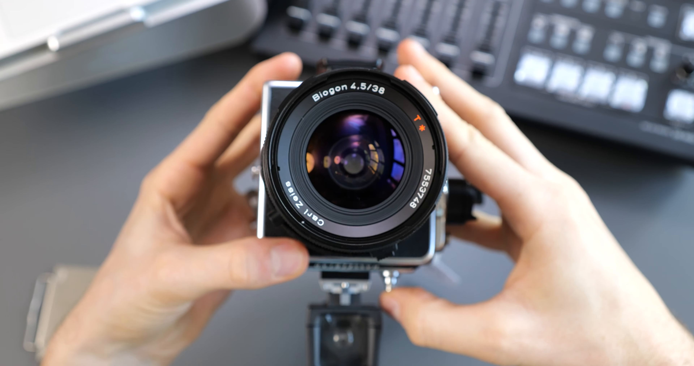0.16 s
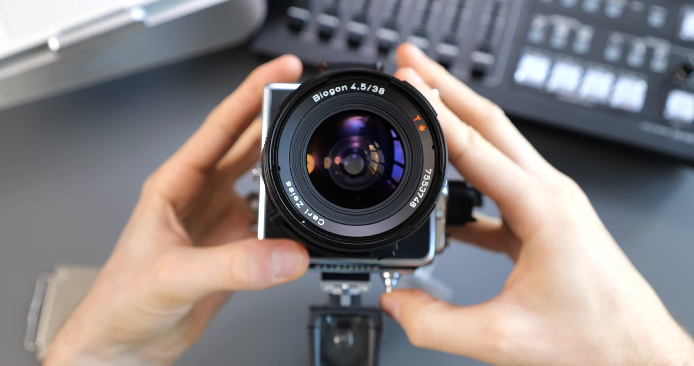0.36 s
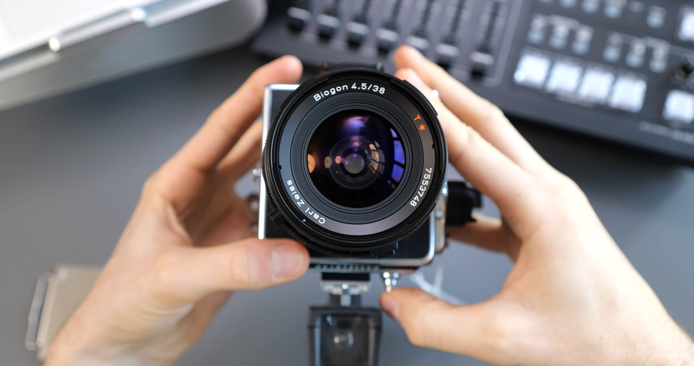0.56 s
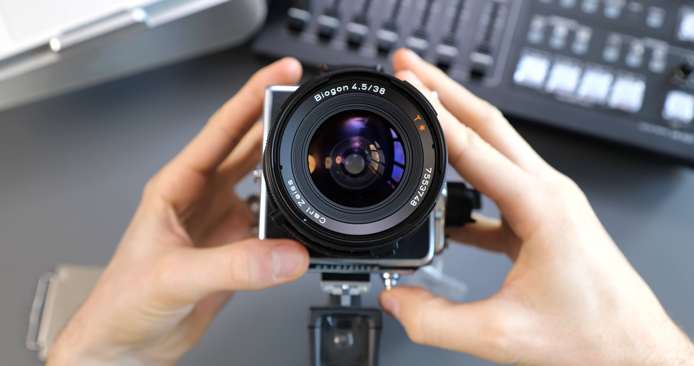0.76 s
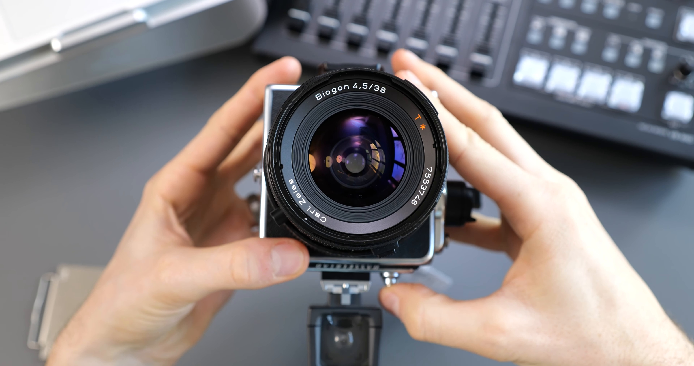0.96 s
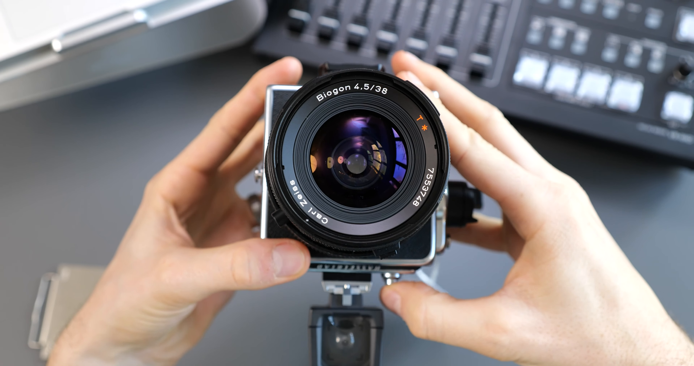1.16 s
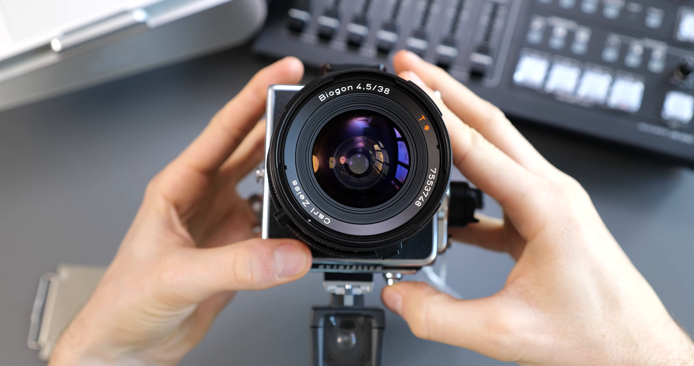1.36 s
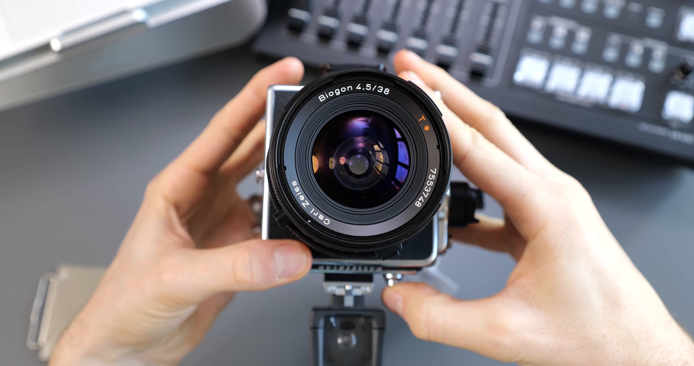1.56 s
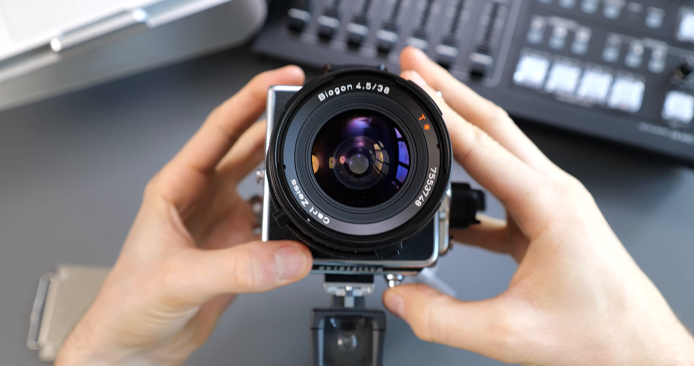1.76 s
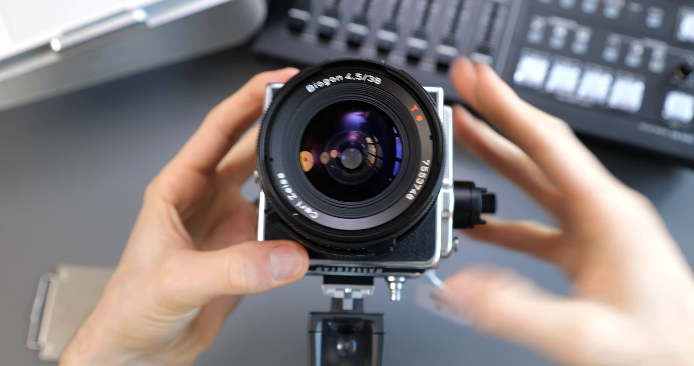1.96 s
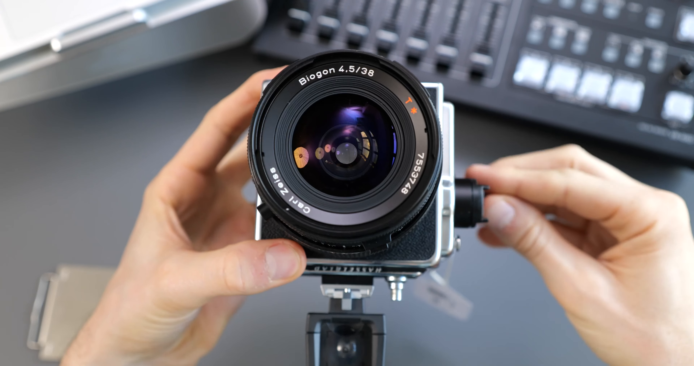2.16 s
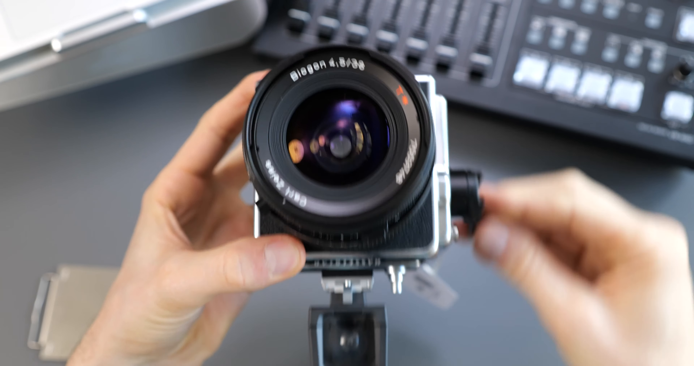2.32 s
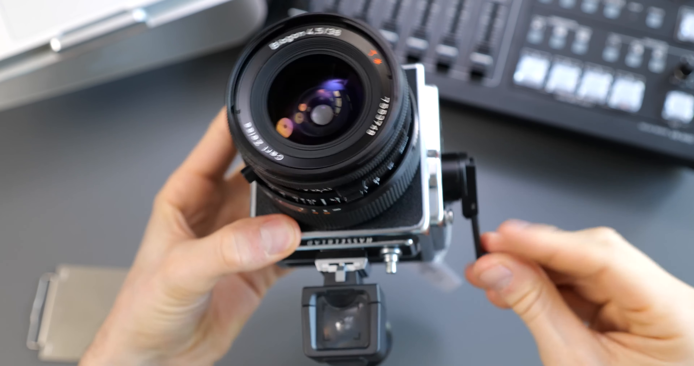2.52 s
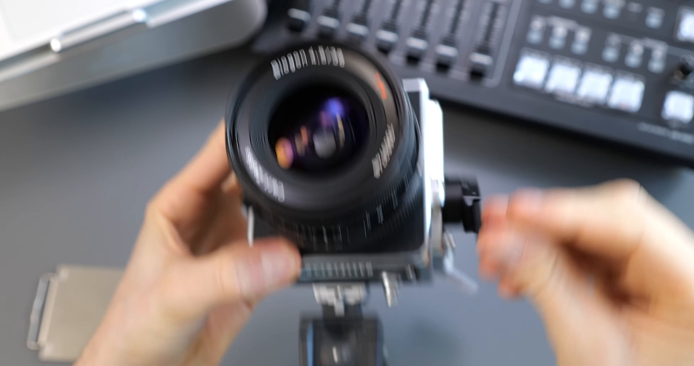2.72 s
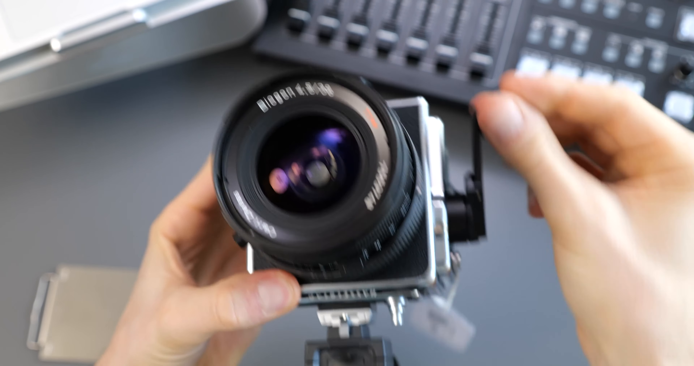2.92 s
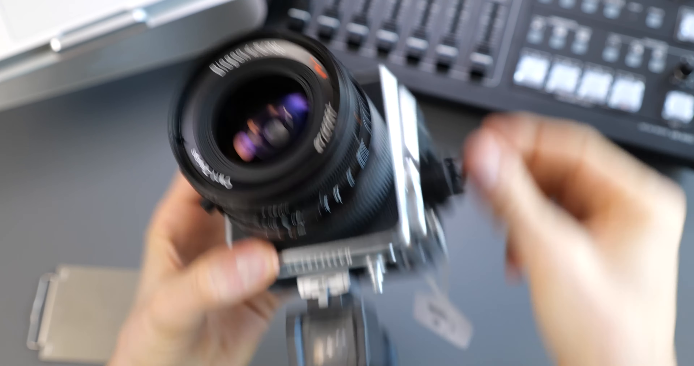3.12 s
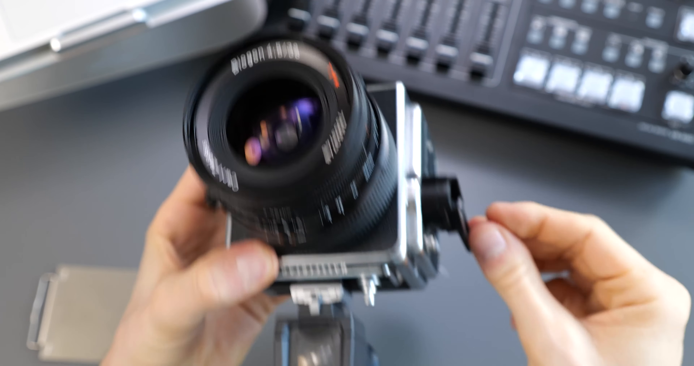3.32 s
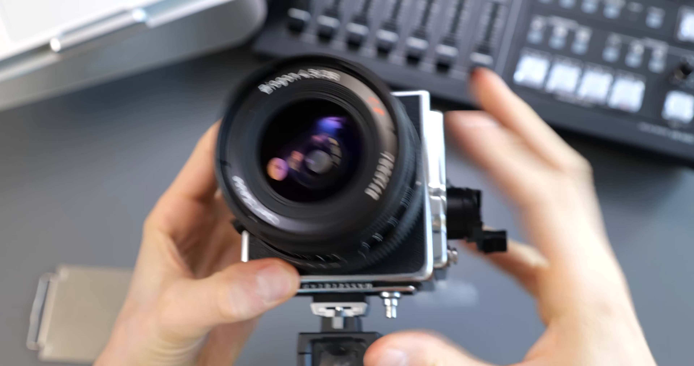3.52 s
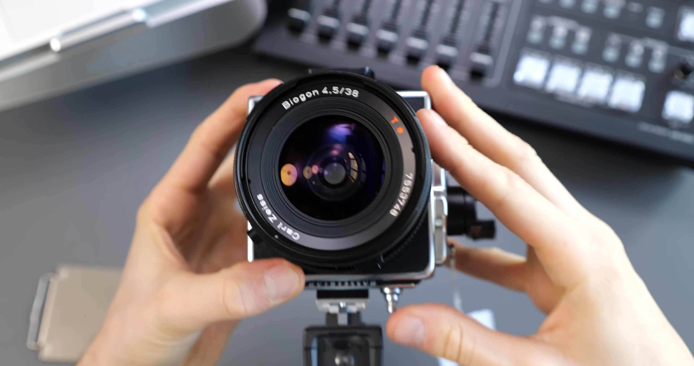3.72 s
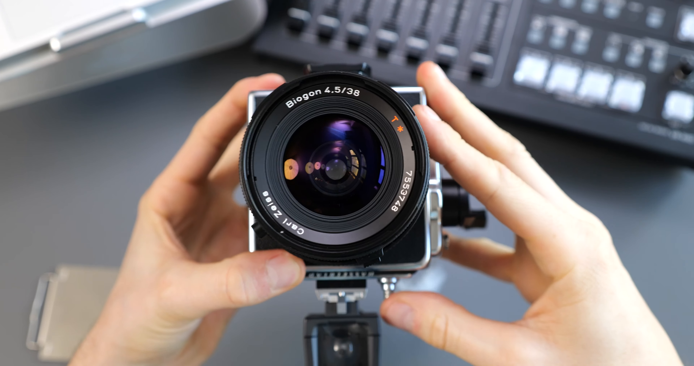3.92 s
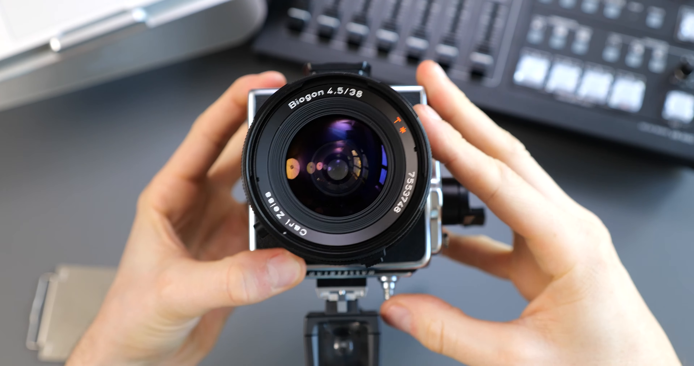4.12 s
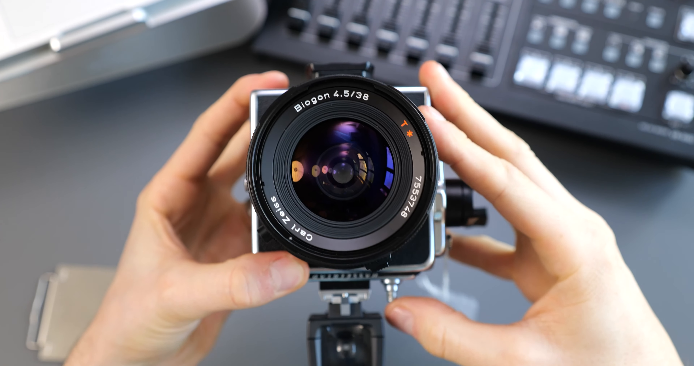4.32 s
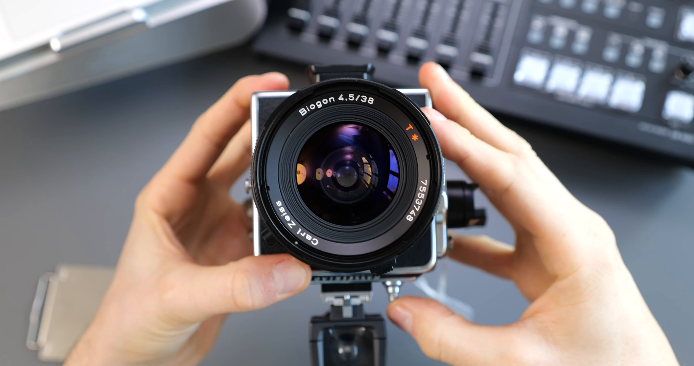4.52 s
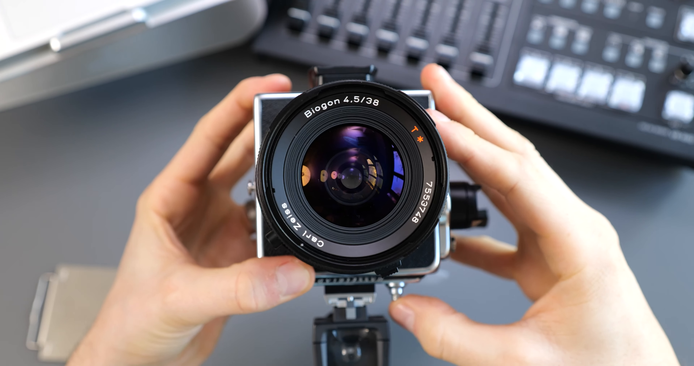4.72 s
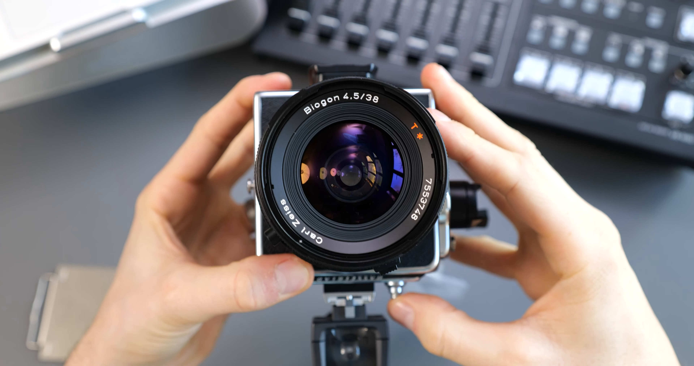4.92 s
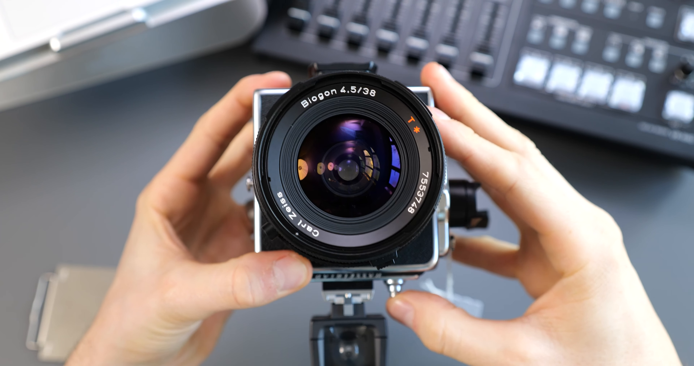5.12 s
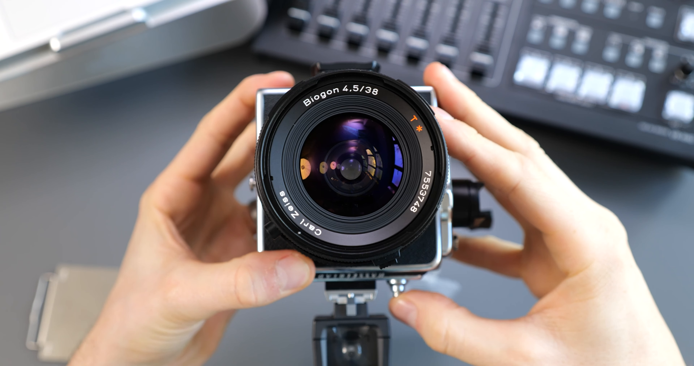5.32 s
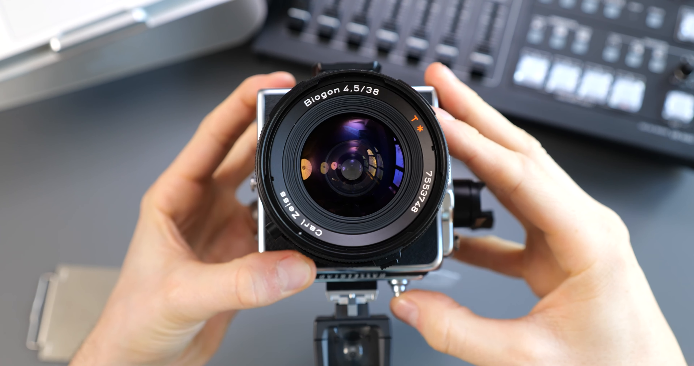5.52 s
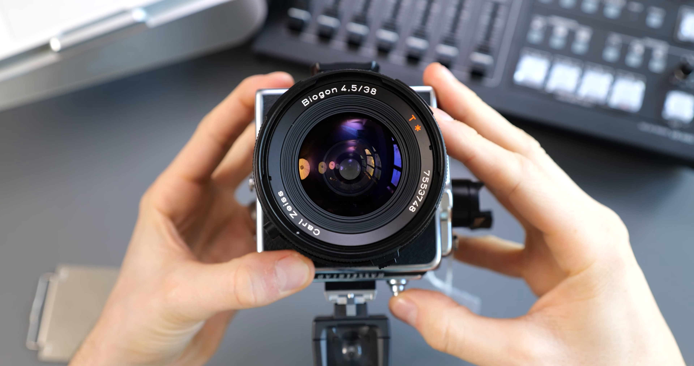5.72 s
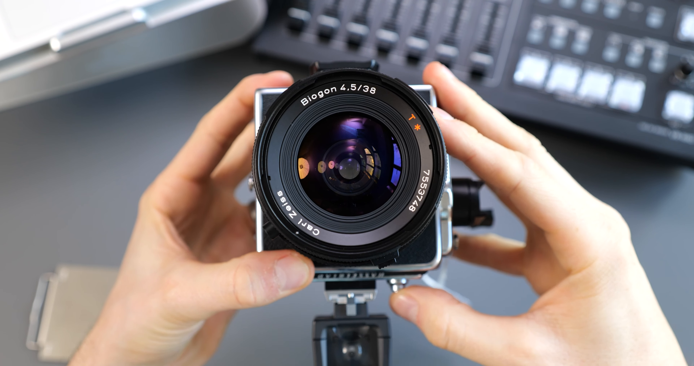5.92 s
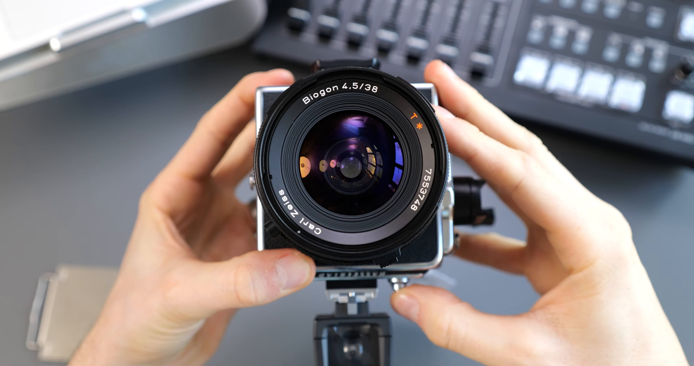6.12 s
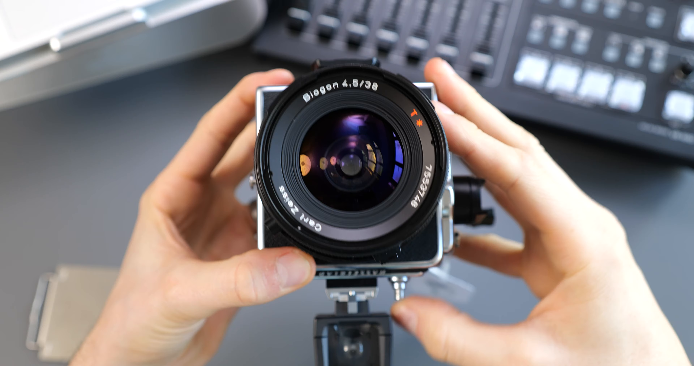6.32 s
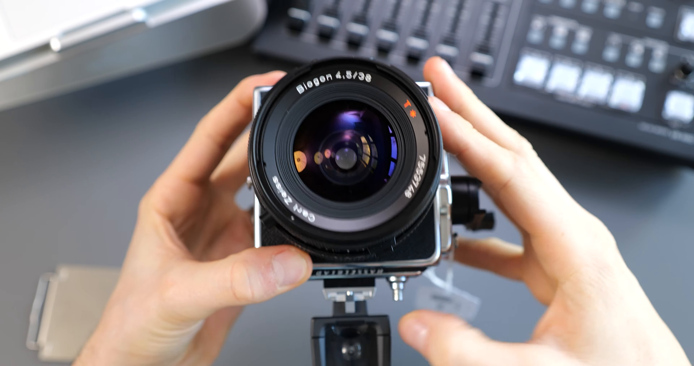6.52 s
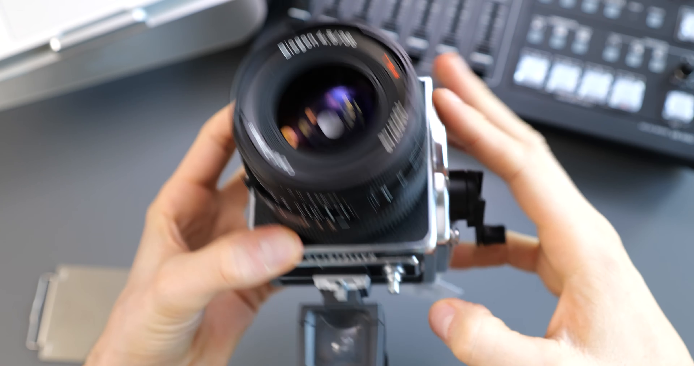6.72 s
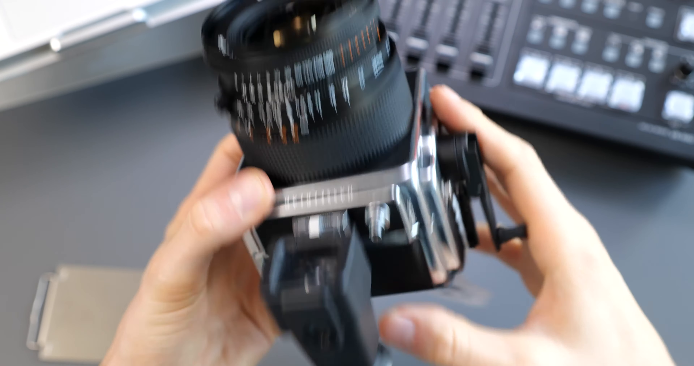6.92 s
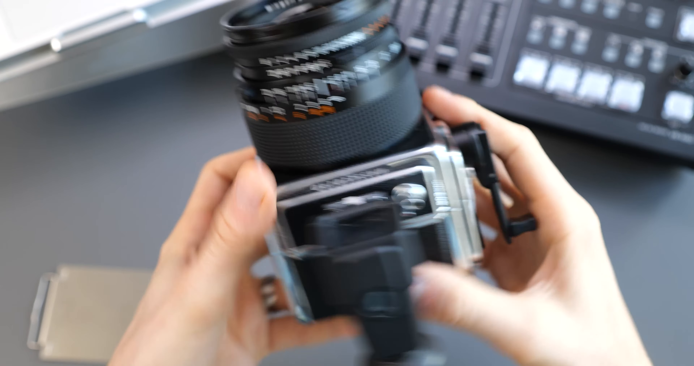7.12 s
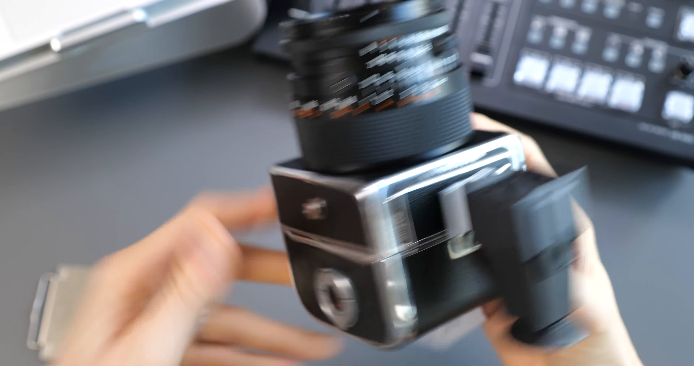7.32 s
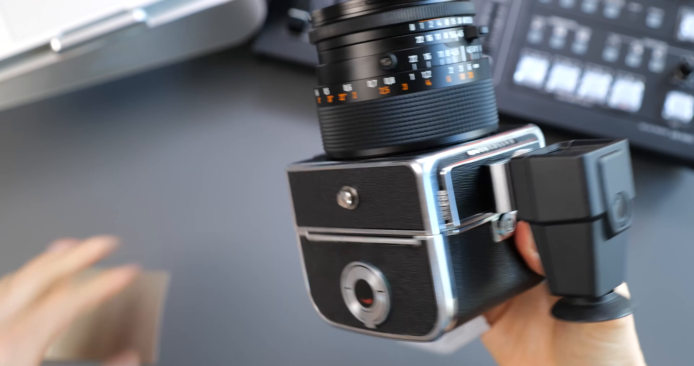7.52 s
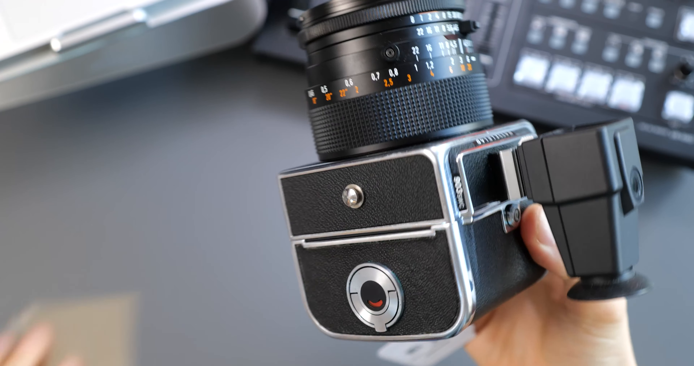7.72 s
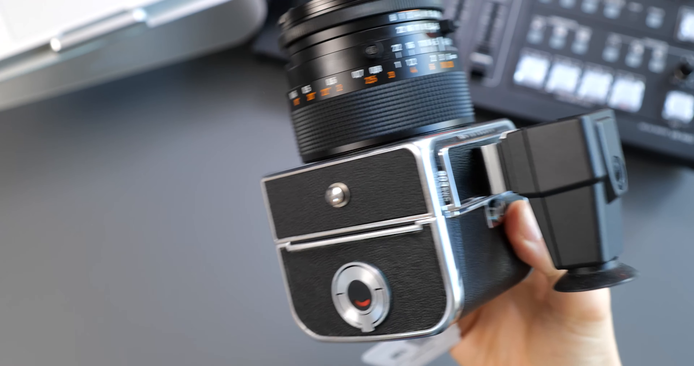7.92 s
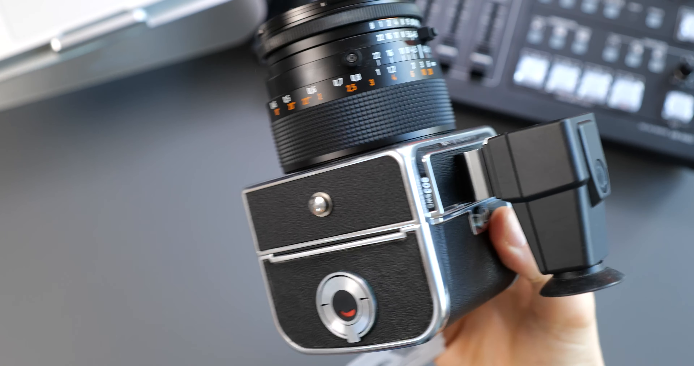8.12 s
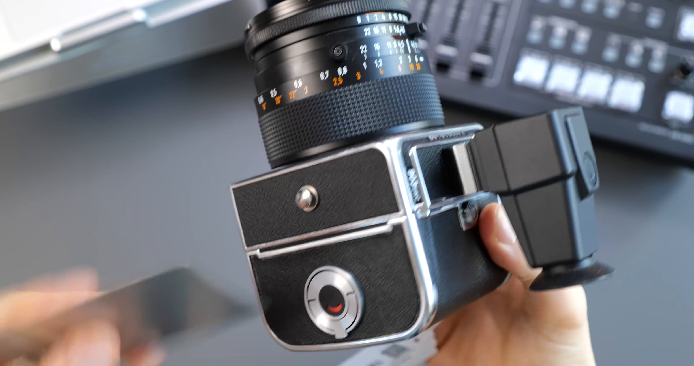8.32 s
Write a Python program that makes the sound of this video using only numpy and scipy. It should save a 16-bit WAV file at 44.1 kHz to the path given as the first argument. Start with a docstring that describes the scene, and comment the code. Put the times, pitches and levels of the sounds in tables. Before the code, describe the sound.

A heavy mechanical camera is worked close to the microphone over a desk. Two slow shutter firings, each a hard clack and a second snap, are followed by smaller spring-back clicks. Between them the crank ratchets unevenly, faster and louder, into a bright metal bang. At the end a plastic cover rasps across the desk with small bumps. Quiet fans and tiny steady ticks continue throughout.

```python
"""A mechanical medium-format camera is handled close up over a desk in a small room.
The shutter fires at a slow speed and the button springs back; the crank winds to a hard stop; it fires again.
Then a plastic cover is dragged off the desk. Fans hum and something ticks faintly all the while.
Metal contacts are bursts of noise that ring the camera; rubbing and dragging are showers of tiny slips;
the background is coloured noise with a steady train of pips."""
import sys
import numpy as np
from scipy import signal
from scipy.fft import rfft, irfft
from scipy.io import wavfile
from scipy.ndimage import uniform_filter1d

SR = 44100
rng = np.random.default_rng(int(sys.argv[2]) if len(sys.argv) > 2 else 0)


def pcm_store(signal):
    """Save signal as 16-bit PCM."""
    levels = np.round(np.clip(np.atleast_2d(signal), -1, 1) * 32767)
    wavfile.write(sys.argv[1], SR, levels.astype(np.int16).T)


N = 373218  # length in samples

# Every *_COLOUR table is a spectrum, of which only the shape counts: pitch_hz, level_db (per Hz)
# Fan rush, narrow fan tones, hiss and low rumble; tones: pitch_hz, width_hz, level_db
FAN_COLOUR = [(18, -88), (30, -57.5), (58, -22.5), (106, -15), (139, -1), (175, -15.5), (214, -9.5),
              (274, -13.5), (319, -10), (720, -13), (809, -10.5), (971, -22.5), (1060, -10.5),
              (1450, -15.5), (1600, -27.5), (2080, -55), (3520, -120)]
FAN_TONES = [(88, 18, -88), (153, 25, -76.5), (513, 66, -78), (844, 208, -76.5), (1046, 80, -70.5),
             (1450, 110, -75.5)]
HISS_COLOUR = [(940, -32), (1600, -2.5), (1920, -2), (4030, -9), (4940, -11), (5390, -11.5), (5930, -11.5),
               (14700, -15), (16000, -26.5)]
RUMBLE_COLOUR = [(50, -36), (110, -11.5), (180, 4), (320, -2), (500, -7.5), (900, -22.5), (2000, -44.5)]
FAN_DB, HISS_DB = -65.5, -71.5
# The rumble fades from its first level to a resting one
RUMBLE_FIRST_DB, RUMBLE_REST_DB, RUMBLE_FADE_S = -61, -73, 2.3
TICK_START_S, TICK_PERIOD_S, TICK_DB = 0.0055, 0.08, -74

# How fast the room dies away at each pitch: pitch_hz, t60_s (time to fall by 60 dB)
ROOM_T60 = [(200, 0.61), (1000, 0.19), (3500, 0.25), (8000, 0.23), (15000, 0.08)]
CUTOFF_HZ = 15800

# A hand or the cover bumps the desk: middle_s, length_s, level_db (before the mix)
DESK_BUMPS = [(4.609, .06, -59), (7.752, 0.017, -45.5), (8.023, 0.024, -49.5)]
DESK_COLOUR = [(40, -46), (60, -21), (80, -5), (135, 5), (250, 0), (450, -3), (900, -5), (2000, -52)]
DESK_SHARE_DB = -29.5  # rumble of the desk relative to the friction
# Friction of the cover dragged over the desk: time_s, level_db (before the mix)
DRAG_FRICTION = [(7.736, -86), (7.745, -46), (7.82, -37), (7.875, -38), (7.95, -30), (8.012, -31),
                 (8.035, -40), (8.06, -25.5), (8.107, -37.5), (8.125, -75)]
DRAG_COLOUR = [(210, -43), (350, -21), (622, -17), (685, -4.5), (766, -30), (1090, -5), (1180, -16),
               (1630, 0.5), (1760, -7.5), (2310, -1), (3920, -4.5), (4820, -3), (11400, -3.5),
               (16000, -18.5)]
# The cover's edge catches and sings: middle_s, length_s, level_db (before the mix), pitch_hz, width_hz
SCRAPES = [(7.794, 0.07, -40, 3400, 800), (7.859, 0.11, -44, 1160, 300), (7.92, 0.019, -37.5, 1100, 350),
           (7.937, 0.035, -39, 2400, 595), (8.054, 0.023, -27.5, 2570, 500), (8.085, 0.029, -51, 1410, 120),
           (8.092, 0.036, -27, 10000, 2500)]

# Fingers rub on the body: middle_s, length_s, level_db
RUBS = [(2.55, .35, -68), (3.502, 0.29, -67.5), (6.88, .25, -81), (7.265, 0.086, -65.5), (8.241, .16, -76),
        (8.433, .025, -63.5)]
RUB_COLOUR = [(500, -21.5), (1800, -6.5), (2500, 4), (3500, -3.5), (7000, -3), (11500, -4), (16000, -15.5)]
# Dull knocks of fingers and fittings: start_s, level_db, pitch_hz, half_width_hz
KNOCKS = [(2.0010, -44, 3000, 300), (2.2320, -52, 2780, 2500), (2.4808, -48, 2300, 900),
          (2.519, -38.5, 2030, 1100), (7.0252, -46, 2270, 700), (7.4137, -40.5, 1200, 800)]

# The loose crank handle clinks: start_s, level_db (of the tap, before knock and ring are mixed)
CLINKS = [(2.2379, -42.5), (2.399, -52.5), (3.292, -19.5), (3.5172, -34.5), (3.558, -50), (7.024, -43)]
CLINK_COLOUR = [(710, -39.5), (1200, -17), (2730, -9.5), (4960, -19), (6300, -2.5), (9510, -9.5),
                (11900, -10), (15300, -25), (16000, -51)]
# Ringing of the handle: pitch_hz, level_db (relative), t60_s
HANDLE_MODES = [(5615, 5.5, 0.035), (5850, -0.5, .09), (5957, -9, 0.052), (5866, -3.5, .08),
                (6510, -8.5, .08), (7219, -2, 0.06), (7524, -11, .07), (8670, -7, .06), (12100, 2, .05)]

# Speed of the crank, which hesitates, races, slows and pushes home: time_s, speed_teeth_per_s
CRANK = [(2.462, 51), (2.58, 51), (2.595, 7), (2.615, 70), (2.70, 54), (2.745, 145), (2.95, 135),
         (3.05, 60), (3.26, 120)]
STOP_S = 3.2596  # the crank reaches the end of its turn
GEAR_COLOUR = [(350, -52.5), (600, -24), (970, -35), (1050, -23.5), (1330, -9.5), (1510, -18.5),
               (1850, -10), (2150, -21.5), (2870, -5), (3160, -11.5), (4710, -6.5), (11200, 0.5),
               (14700, -6.5), (16000, -23)]
# Resonances of the gear wheels: pitch_hz
WHEEL_HZ = [1330, 1700, 1900, 2400, 2750, 3173, 3930]
# Winding grows louder with speed and as the spring tightens; WIND_DB holds at 100 teeth per s
WIND_DB, DB_PER_DOUBLING, TENSION_DB, TENSION_POWER = -37.5, 1.8, 5.5, 3.3
SLACK_DB, SLACK_S = 13, 0.04  # quieter start while the gears take up their slack
RASP_DB = -7  # gear rasp against the pawl's clicks, at top speed
ESCAPEMENT_DB = -50.5

# The shutter fires: open_s, close_s, opening_strength_db
EXPOSURES = [(1.098, 1.1762, 0.5), (5.8626, 5.9358, -0.5)]
# The button springs back: start_s, strength_db
RELEASES = [(1.9184, 0), (6.3990, -.5)]
# Each action is a fixed run of contacts:
# delay_ms, level_db (before the action's strength), chatter_ms, low_weight_db, left_over_right_db
OPENING = [(-2, -19, 1.5, 0, 1.5), (0, -10, 1.6, 3, 0), (2.2, -11, 1.1, 1.5, -.5),
           (7.2, -26.5, 3.6, -2, -2)]
CLOSING = [(-3.5, -26, 1.6, 4, -1), (0, -13.5, 1.57, -4.5, .5), (12, -44, 1.2, -16, 0)]
SPRING_BACK = [(-3, -43, 4.4, -3, 9), (0, -22.5, 1.8, -0.5, 0.5), (3.5, -27, 2.3, 10, -.5)]
HARD_STOP = [(-8.5, -24, 3.6, 2.5, 0), (0, -4.5, 1, 3, 2), (2, -1.5, .7, -5, -.5), (4, -17.5, 2.2, 2, -2.5),
             (18, -26, 8, 0.5, -1), (28, -18, 5.5, 2.5, .5)]
# A single part snags or settles: start_s, level_db, low_weight_db
SNAGS = [(2.4799, -40.5, 11), (2.5200, -38, 4), (2.5440, -36, -16), (2.6130, -40, -20),
         (2.6398, -38.5, 4.5), (2.843, -25.5, -14), (2.8950, -36.5, -14.5), (3.113, -35, -11.5),
         (3.2350, -22, -4.5), (4.5599, -50.5, 2), (6.7806, -68.5, 18.5), (7.413, -61, 19.5)]
SNAG_MS = 2.4  # chatter of a snag
BLOW_COLOUR = [(120, -35.5), (200, -23.5), (440, -22), (671, -12), (950, -20), (1060, -8.5), (1320, -10),
               (2330, -5.5), (3310, -2.5), (5040, -2.5), (5840, -3), (10500, -1), (14300, -4.5),
               (16000, -18)]
# Broad resonances of the camera shell: pitch_hz, width_hz, lift_db
SHELL = [(370, 160, 2), (668, 150, 3), (920, 150, 4.5), (1140, 210, 1.5), (1700, 250, 2), (2050, 700, 5.5),
         (3280, 900, 1), (5170, 300, 2), (10700, 4700, 6)]
# Ringing of the camera body: pitch_hz, level_db (relative), t60_s
BODY_MODES = [(2120, -8, 0.0784), (2325, -3.5, 0.083), (2950, -5.5, .12), (3650, -10, 0.15),
              (4250, -7, 0.14), (4732, -7.5, .15), (6900, -5, .16), (7200, -5, .16), (7800, -4.5, .14),
              (8240, -4, 0.12), (8640, -4, 0.11), (9370, 0, 0.14), (10000, -3, .11), (10250, 0.5, .1),
              (11300, -2.5, .1), (11000, -0.5, 0.078), (12462, -2.5, .13), (12700, -2, .11)]


def from_db(db):
    """Turn decibels into a gain."""
    return 10 ** (np.asarray(db) / 20)


def rms_one(x):
    """Scale a sound so that its average strength (rms) is 1."""
    return x / np.sqrt(np.mean(x ** 2) + 1e-20)


def at_hz(points, hz):
    """Read a table between its points on a log-frequency axis."""
    f, value = np.transpose(points)
    return np.interp(np.log(hz + 1e-3), np.log(f), value)


def convolve_unit(x, response):
    """Filter by a response scaled to unit energy, which leaves the power of white noise as it was."""
    response = response[None] / np.linalg.norm(response)
    return signal.oaconvolve(np.atleast_2d(x), response, axes=1)[:, :N]


def colour(x, spectrum, peaks=(), size=8192):
    """Give a sound a spectrum with resonant humps, using a filter that never sounds ahead of its input."""
    hz = np.fft.rfftfreq(size, 1 / SR)
    humps = sum(lift / (1 + (2 * (hz - f) / width) ** 2) for f, width, lift in peaks)
    # folding the cepstrum makes the filter minimum phase
    cepstrum = irfft(np.log(from_db(at_hz(spectrum, hz) + humps)))
    cepstrum[1:size // 2] *= 2
    cepstrum[size // 2 + 1:] = 0
    return convolve_unit(x, irfft(np.exp(rfft(cepstrum))))


def resonate(x, hz, width_hz):
    """One resonance with unit gain at its top."""
    r = np.exp(-np.pi * width_hz / SR)
    top = np.array([1, 0, -1]) * (1 - r * r) / 2
    bottom = [1, -2 * r * np.cos(2 * np.pi * hz / SR), r * r]
    return signal.lfilter(top, bottom, x + 1e-18)


def ring(x, modes):
    """Strike a set of fading tones whose joint response has unit energy; their signs alternate."""
    t = np.arange(SR // 2) / SR
    response = 0
    for k, (hz, db, t60) in enumerate(modes):
        response = response + (-1) ** k * from_db(db - 60 * t / t60) * np.sin(2 * np.pi * hz * t)
    return convolve_unit(x, response)


def stereo_noise(side_db):
    """White noise, mostly common to both channels."""
    mid, side = rng.standard_normal((2, N))
    return mid + from_db(side_db) * side * np.array([[1], [-1]])


def chatter(s, decay_ms, count=4):
    """A contact is a dying flurry of micro-impacts, even in spectrum; returns its place and samples."""
    t_ms = np.arange(SR // 15) * 1000 / SR
    start = round(s * SR)
    envelope = np.exp(-t_ms / max(decay_ms, 0.1))
    burst = rng.standard_normal(len(t_ms)) * envelope
    # by turns flatten the spectrum and hold the burst inside its fading outline
    for _ in range(count):
        flat = irfft(np.exp(1j * np.angle(rfft(burst))), len(t_ms)) * np.linalg.norm(envelope)
        burst = np.clip(flat, -np.pi * envelope, np.pi * envelope)
    return slice(start, start + len(t_ms)), burst


def grains(per_s, spread_db):
    """Random tiny slips of uneven size and either sign; rms 1."""
    sizes = from_db(spread_db * np.minimum(rng.exponential(1, N), 4)) * rng.choice([-1, 1], N)
    return rms_one(sizes * (rng.random(N) < per_s / SR))


def swell(middle_s, length_s):
    """The smooth rise and fall of one stroke; 1 at its middle."""
    distance = 2 * (np.arange(N) / SR - middle_s) / length_s
    return np.exp(-np.minimum(distance ** 2, 50))


def background():
    """Fan rush with its narrow tones, a low rumble and microphone hiss, all shaped from noise."""
    fan_humps = [(700, 360, -4), (1018.6, 130, -6.0)]
    rush = from_db(FAN_DB) * colour(stereo_noise(side_db=-30.5), FAN_COLOUR, fan_humps)
    tones = 0
    for hz, width, db in FAN_TONES:
        # long waves reach both capsules alike
        air = stereo_noise(side_db=-6.5 + 20 * np.log10(hz / 1000))
        tones = tones + from_db(db) * rms_one(resonate(resonate(air, hz, width), hz, width))
    fade = np.exp(-(np.arange(N) / SR / RUMBLE_FADE_S) ** 2)
    rumble_db = RUMBLE_REST_DB + (RUMBLE_FIRST_DB - RUMBLE_REST_DB) * fade
    rumble = from_db(rumble_db) * colour(stereo_noise(side_db=-31.0), RUMBLE_COLOUR)
    hiss = from_db(HISS_DB) * colour(stereo_noise(side_db=-5.5), HISS_COLOUR)
    return rush + tones + rumble + hiss


def ticking(hz=4860, length_s=0.0068, knock_db=-5, waver_hz=60):
    """A small motor steps at a steady rate: a short pip over a soft, duller rustle."""
    half = TICK_PERIOD_S / 2
    from_tick_s = (np.arange(N) / SR - TICK_START_S + half) % TICK_PERIOD_S - half
    step = np.exp(-(from_tick_s / length_s) ** 4)
    waver = waver_hz * rms_one(uniform_filter1d(rng.standard_normal(N), size=100))
    pip = np.sqrt(2) * np.sin(2 * np.pi * np.cumsum(hz + waver) / SR)
    rustle = rms_one(resonate(resonate(rng.standard_normal(N), 3700, 1400), 3400, 1400))
    return from_db(TICK_DB) * step * (pip + from_db(knock_db) * rustle)


def drag_gain():
    """Strength of the cover's friction; zero before and after the drag."""
    times, levels = np.transpose(DRAG_FRICTION)
    return from_db(np.interp(np.arange(N) / SR, times, levels, left=-np.inf, right=-np.inf))


def desk():
    """The desk top rumbles under the dragged cover and thuds when it is bumped."""
    bumps = sum(from_db(db) * swell(s, length) for s, length, db in DESK_BUMPS)
    shake = from_db(DESK_SHARE_DB) * drag_gain() + bumps
    return colour(grains(per_s=18000, spread_db=0.5) * shake, DESK_COLOUR)


def cover():
    """Dense friction grains; the scraping edge resonates at another pitch each time it catches."""
    slips = grains(per_s=4200, spread_db=1)
    edge = 0
    for s, length, db, hz, width in SCRAPES:
        edge = edge + from_db(db) * swell(s, length) * rms_one(resonate(slips, hz, width))
    humps = [(1100, 100, 3.2), (1350, 100, 5.3), (4750, 440, 3.3), (8460, 1300, 3.4)]
    friction = colour(grains(per_s=7000, spread_db=-1.0) * drag_gain(), DRAG_COLOUR, humps)
    return (friction + edge) * from_db([[0.6], [-0.6]])  # a little to the left


def fingers():
    """Soft contacts wake one damped resonance each; skin rubs over the leather and metal."""
    rubbing = sum(from_db(db) * swell(s, length) for s, length, db in RUBS)
    out = rubbing * colour(grains(per_s=7500, spread_db=5), RUB_COLOUR)[0]
    for s, db, hz, half_width_hz in KNOCKS:
        width_hz = 2 * half_width_hz
        where, burst = chatter(s, decay_ms=3.1)
        knock = resonate(resonate(burst, hz, width_hz), hz, width_hz)
        # keep the energy of the burst
        out[where] += from_db(db) * knock * np.linalg.norm(burst) / np.linalg.norm(knock)
    return out


def handle(knock_db=-2, ring_db=-4):
    """The folding crank handle taps its seat and rings."""
    force = np.zeros(N)
    for s, db in CLINKS:
        where, burst = chatter(s, decay_ms=3.5)
        force[where] += from_db(db) * burst
    knock = from_db(knock_db) * colour(force, CLINK_COLOUR)
    return knock + from_db(ring_db) * ring(force, HANDLE_MODES)


def crank():
    """Ratchet speed (teeth per s) and the gain of the winding noise that follows from it."""
    t, start = np.arange(N) / SR, CRANK[0][0]
    turning = (t >= start) & (t < STOP_S)
    per_s = np.maximum(np.interp(t, *np.transpose(CRANK)), 1)
    since = np.clip(t - start, 0, STOP_S - start)
    speed_db = DB_PER_DOUBLING * np.log2(per_s / 100)
    tension_db = TENSION_DB * (since / (STOP_S - start)) ** TENSION_POWER
    slack_db = SLACK_DB * np.exp(-since / SLACK_S)
    return per_s * turning, from_db(WIND_DB + speed_db + tension_db - slack_db) * turning


def gears(tooth_ms=4.2, uneven_db=2.5, wheel_db=-16, wheel_width_hz=200):
    """A pawl drops off ratchet teeth over gear rasp that grows with speed; the escapement whirrs."""
    per_s, gain = crank()
    t = np.arange(N) / SR
    # count the teeth passed, and the time since the last one
    tooth = np.ceil(np.cumsum(per_s) / SR).astype(int)
    new_tooth = np.diff(tooth, prepend=0) > 0
    since_ms = 1000 * (t - np.maximum.accumulate(t * new_tooth))
    strength = from_db(uneven_db * np.clip(rng.standard_normal(N), -2, 2))[tooth]
    pawl = strength * np.exp(-since_ms / tooth_ms) * rng.standard_normal(N)
    rasp = from_db(RASP_DB) * (per_s / per_s.max()) ** 2 * grains(per_s=2500, spread_db=1)
    force = gain * (pawl + rasp)
    # every tooth also rings the wheels
    wheels = 0
    for k, hz in enumerate(WHEEL_HZ):
        wheels = wheels + (-1) ** k * resonate(gain * pawl, hz, wheel_width_hz)
    wheels = np.std(force) * rms_one(wheels)
    # the escapement runs while the shutter is open
    whirr = grains(per_s=2500, spread_db=2.5)
    for opens, closes, _ in EXPOSURES:
        where = slice(round(opens * SR), round(closes * SR))
        force[where] += from_db(ESCAPEMENT_DB) * whirr[where]
    train = colour(force, GEAR_COLOUR, [(1900, 1200, -4), (8900, 600, 3.5), (11240, 2500, 2)])
    return train + from_db(wheel_db) * wheels


def contacts():
    """List the metal contacts of every action and snag: start_s, level_db, chatter_ms, weight_db, pan_db."""
    actions = [(STOP_S, 0, HARD_STOP)]
    actions += [(s, db, SPRING_BACK) for s, db in RELEASES]
    for opens, closes, db in EXPOSURES:
        actions += [(opens, db, OPENING), (closes, 0, CLOSING)]
    hits = []
    for s, strength_db, run in actions:
        hits += [(s + ms / 1000, strength_db + db, *rest) for ms, db, *rest in run]
    return hits + [(s, db, SNAG_MS, weight_db, 0) for s, db, weight_db in SNAGS]


def blows(split_hz=3500, ring_db=-15):
    """Levers, blades and stops hit the shell and ring it; heavy parts put more into the lows."""
    force, heavy = np.zeros((2, 2, N))
    for s, db, decay_ms, weight_db, pan_db in contacts():
        where, burst = chatter(s, decay_ms)
        burst = burst * from_db(db + np.array([[pan_db], [-pan_db]]) / 2)
        force[:, where] += burst
        heavy[:, where] += burst * (from_db(weight_db) - 1)
    force = force + signal.lfilter(*signal.butter(1, split_hz, fs=SR), heavy)
    return colour(force, BLOW_COLOUR, SHELL) + from_db(ring_db) * ring(force, BODY_MODES)


def direction(x, split_hz=3000, low_db=-1.3, high_db=0.7):
    """The body radiates its lows a little to the right and its treble a little to the left."""
    lows = signal.lfilter(*signal.butter(1, split_hz, fs=SR), x)
    sides = np.array([[0.5], [-0.5]])
    return lows * from_db(low_db * sides) + (x - lows) * from_db(high_db * sides)


def room(x, early_db=-3, early_t60=0.083, late_db=-7, side_db=-9, gap_s=0.003, size=8192):
    """Quick scatter from the desk, then a tail that dies band by band."""
    t = np.arange(2 * size) / SR
    hz = np.fft.rfftfreq(len(t), 1 / SR)
    onset = np.clip(t / gap_s - 0.5, 0, 1)
    early = onset * np.exp(-np.log(1000) * t / early_t60)
    early = from_db(early_db) * early / np.linalg.norm(early)
    bands = []
    for centre, t60 in ROOM_T60:
        late = onset * np.exp(-np.log(1000) * t / t60)
        late = from_db(late_db) * late / np.linalg.norm(late)
        share = at_hz([(f, f == centre) for f, _ in ROOM_T60], hz)
        bands.append((share, np.hypot(early, late)))
    out = np.zeros((2, N + 3 * size))
    # every block of 8192 samples is scattered by its own random echo pattern
    for i in range(0, N, size):
        mid, side = rfft(rng.standard_normal((2, len(t))))
        scatter = mid + from_db(side_db) * side * np.array([[1], [-1]])
        scatter = scatter / np.hypot(1, from_db(side_db))
        response = sum(irfft(scatter * share) * decay for share, decay in bands)
        echoes = signal.fftconvolve(x[:, i:i + size], response, axes=1)
        out[:, i:i + echoes.shape[1]] += echoes
    return out[:, :N]


def scene(finger_room_db=-7):
    """Camera, cover and desk fill the room; soft touches send less into it; ticks and background stay dry."""
    near = direction(blows() + handle() + gears()) + from_db(-4.5) * (cover() + desk())
    touch = fingers()
    echoes = room(near + from_db(finger_room_db) * touch)
    return near + touch + echoes + ticking() + background()


def record(dry, low_cut_hz=55):
    """The microphone sheds the deep bass, peaks beyond full scale clip and the top is cut."""
    lean = signal.sosfilt(signal.butter(1, low_cut_hz, "high", fs=SR, output="sos"), dry)
    top_cut = signal.ellip(10, 0.1, 85, CUTOFF_HZ, fs=SR, output="sos")
    return signal.sosfilt(top_cut, np.clip(lean, -1, 1))


dry = scene()
out = record(dry)
pcm_store(out)
```